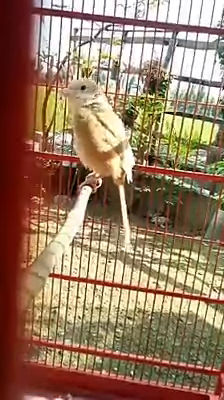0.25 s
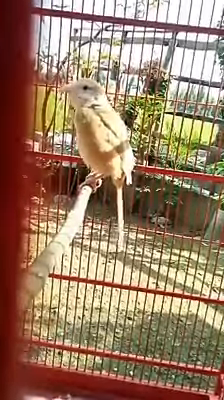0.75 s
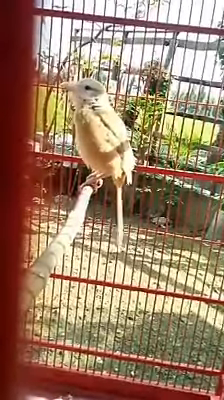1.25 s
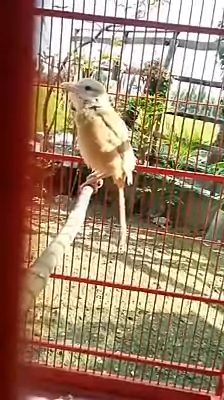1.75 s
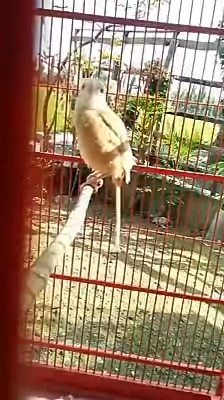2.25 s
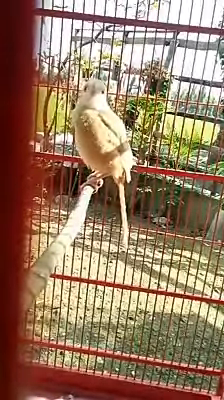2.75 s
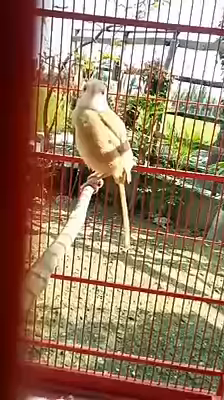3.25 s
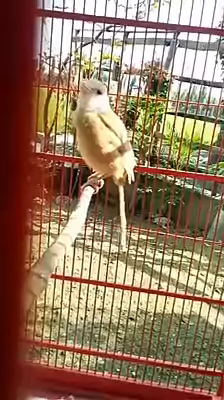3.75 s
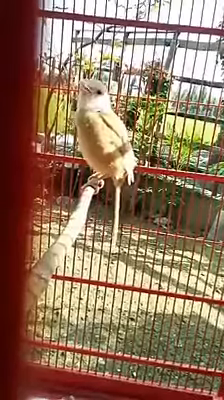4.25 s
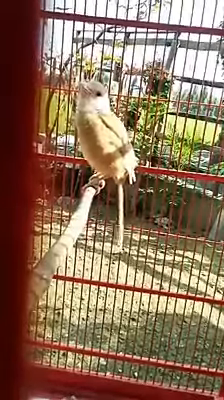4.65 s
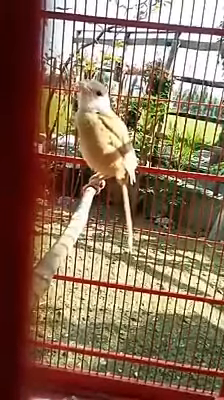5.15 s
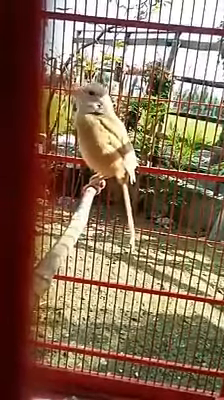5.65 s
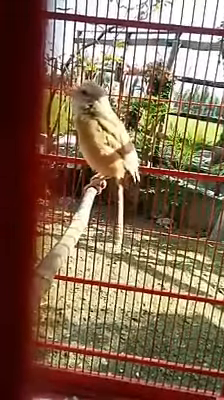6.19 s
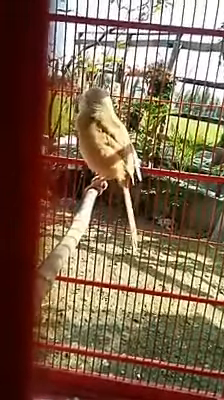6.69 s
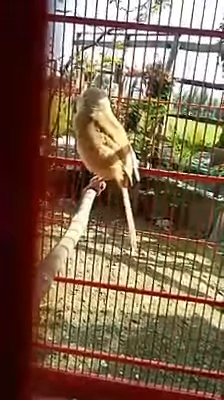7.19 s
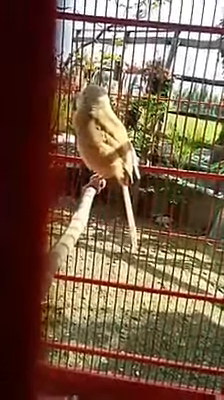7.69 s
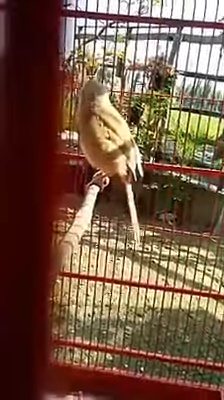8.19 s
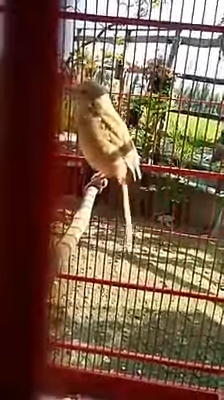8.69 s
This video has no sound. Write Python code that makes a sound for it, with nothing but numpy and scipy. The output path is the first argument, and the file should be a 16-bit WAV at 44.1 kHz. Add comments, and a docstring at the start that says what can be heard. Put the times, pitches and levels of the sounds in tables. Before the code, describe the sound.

Close to a phone outdoors, a caged bird calls in harsh nasal rasps and sharp squeaky chatter, separated by short pauses. The densest, loudest run comes around the middle, then single buzzy notes and chirps follow. Behind it are faint whistles of distant birds, a few soft hen clucks and a low, wavering traffic-like rumble that sinks in the gaps.

```python
"""Caged shrike in a yard

A caged shrike chatters harsh, nasal notes close to a phone: stacks of unsteady partials and turbulence
pass through throat bands, with sine glides, breath noise and a noisy treble. Sine whistles and ringing
clucks of far birds stand over noise shaped as a wavering low rumble and thin wash. The phone's noise
suppressor lets the yard through while calls fill the voice band, and turns it down between them."""
import sys
import numpy as np
from scipy import signal
from scipy.fft import rfft, irfft, next_fast_len
from scipy.io import wavfile
from scipy.ndimage import uniform_filter1d, minimum_filter1d

SR = 44100
rng = np.random.default_rng(int(sys.argv[2]) if len(sys.argv) > 2 else 0)


def dump_mix(stems):
    """Bounce the given channels to the path in sys.argv[1] as a 16-bit WAV at rate SR."""
    frames = np.atleast_2d(stems).T  # one column per channel
    limited = np.clip(frames, -1, 1)  # hard clip at full scale
    pcm = np.round(limited * 32767).astype(np.int16)
    wavfile.write(sys.argv[1], SR, pcm)


N = 393813


def gain_of(db):
    """Decibel law: amplitude ratio of a level."""
    return 10 ** (np.asarray(db) / 20)


def evened(x):
    """Power normalization: scale to rms 1."""
    return x / np.sqrt(np.mean(x ** 2) + 1e-20)


def add(mix, start_s, sound):
    """Linear superposition: add a sound in place, cut at the end of the mix."""
    part = mix[round(start_s * SR):][:len(sound)]
    part += sound[:len(part)]


def band(x, lo_hz, hi_hz, order=4):
    """Band-pass filtering with a maximally flat passband."""
    sos = signal.butter(order, [lo_hz, hi_hz], "band", fs=SR, output="sos")
    return signal.sosfilt(sos, x)


def coloured(points):
    """Spectral shaping: noise of rms 1 that follows the (freq_hz, level_db) points, silent outside them."""
    points_hz, points_db = np.transpose(points)
    size = next_fast_len(N)
    hz = np.fft.rfftfreq(size, 1 / SR)
    shape_db = np.interp(np.log(hz + 1), np.log(points_hz), points_db, -150, -150)
    spectrum = rfft(rng.standard_normal(size)) * gain_of(shape_db)
    return evened(irfft(spectrum, size)[:N])


def wander(count, ms):
    """Low-pass random fluctuation: twice-averaged noise of rms about 1 that changes within ms."""
    size = max(round(ms * SR / 1000), 1)
    once = uniform_filter1d(rng.standard_normal(count), size)
    return uniform_filter1d(once, size) * np.sqrt(1.5 * size)  # restores the rms lost by averaging


def yard():
    """Resonance shaping: far traffic hums in broad low resonances under a thin outdoor wash of noise."""
    # Level of the rumble ahead of the suppressor: time_s, level_db
    rumble_levels = [(0, -46), (.34, -42), (.69, -48), (1.37, -50.5), (2.06, -36), (2.4, -42.5),
                     (3.09, -44), (3.5, -34.5), (4.12, -41), (4.81, -47), (5.15, -39.5), (6.4, -49),
                     (6.87, -39.5), (7.21, -39.5), (7.8, -21), (8.24, -36), (8.6, -39.5), (9, -42.5)]
    # Low resonances: centre_hz, width_hz, relative_db
    resonances = [(62, 25, 0.5), (85, 16, 6), (157, 13, -20.5)]
    # Relative spectral density of the wash: freq_hz, level_db
    wash_spectrum = [(110, 1.5), (130, -6.5), (240, -22), (300, -30), (720, -28), (1900, -26),
                     (4900, -25.5), (5800, -31), (6800, -44.5), (8300, -50), (15000, -63)]
    wash_mean_db, wash_follows = -51.5, .4  # the wash follows the rumble's level by a share

    rumble_db = np.interp(np.arange(N) / SR, *np.transpose(rumble_levels))
    wash_db = wash_mean_db + wash_follows * (rumble_db - rumble_db.mean())
    hz = np.geomspace(15, 400, 80)
    power = sum(gain_of(db) ** 2 / (1 + (2 * (hz - centre_hz) / width_hz) ** 2) ** 3
                for centre_hz, width_hz, db in resonances)
    rumble = coloured(np.c_[hz, 10 * np.log10(power)])
    wash = coloured(wash_spectrum) * gain_of(0.54 * wander(N, 30))
    common = gain_of(rumble_db) * rumble + gain_of(wash_db) * wash
    # a weak delayed copy of opposite sign at the two microphone ports
    return common + .03 * np.roll(common, SR // 20) * [[1], [-1]]


def far_whistles():
    """Frequency modulation: gliding sines flutter in pitch and level, with weak harmonics."""
    # Far whistles: start_s, length_s, from_hz, to_hz, from_db, to_db
    whistles = [(.69, 0.062, 2600, 2480, -77, -65), (1.011, 0.078, 1950, 2040, -66, -64.5),
                (1.239, .14, 2370, 2160, -78.5, -64), (2.598, 0.092, 2650, 2057, -68, -65),
                (2.804, 0.078, 2150, 2500, -74, -56), (4.861, 0.091, 1768, 1840, -45.5, -42),
                (5.58, 0.089, 1950, 1925, -71.5, -60), (5.785, 0.15, 2320, 2150, -73.5, -66.5),
                (6.647, .28, 1862, 1815, -54.5, -55), (6.742, .13, 2840, 2505, -59.5, -73.5),
                (6.944, .14, 1780, 1765, -45, -61), (7.097, 0.042, 1770, 1770, -69, -69),
                (8.467, 0.08, 3350, 3250, -79, -66)]
    overtones_below_hz = 2100  # whistles that start lower carry stronger overtones

    out = np.zeros(N)
    for start_s, length_s, from_hz, to_hz, from_db, to_db in whistles:
        hz, db = np.linspace((from_hz, from_db), (to_hz, to_db), round(length_s * SR)).T
        n = len(hz)
        overtone_db = -16 if from_hz < overtones_below_hz else -34
        phase = 2 * np.pi * np.cumsum(hz * (1 + 0.0031 * wander(n, 11.0))) / SR
        flutter = gain_of(db + 4.9 * wander(n, 6.6)) * signal.windows.tukey(n, .3)
        overtones = np.sin(2 * phase) + 0.72 * np.sin(3 * phase)
        tone = np.sin(phase) + gain_of(overtone_db) * overtones
        add(out, start_s, np.sqrt(2) * flutter * tone)  # sqrt 2: a sine of rms 1
    return out


def far_clucks():
    """Modal decay: a far hen's clucks are damped sines roughened by fast random modulation."""
    # Clucks: start_s, level_db
    clucks = [(3.0041, -41.5), (3.4047, -39), (6.6476, -56), (7.1791, -51.5), (7.585, -39.5),
              (7.984, -45.5)]
    # Modes of one cluck: freq_hz, relative_db, t60_s
    modes = [(1136, 6, 0.17), (1107, 16, 0.032), (750, -5, 0.085), (546, -9, 0.11), (5050, -17, 0.25)]

    out = np.zeros(N)
    t = np.arange(SR // 5) / SR
    onset = 1 - np.exp(-(t / .009) ** 2)
    for start_s, level_db in clucks:
        rings = sum(gain_of(db - 60 * t / t60_s) * np.sin(2 * np.pi * hz * t) for hz, db, t60_s in modes)
        rasp = 1 + 0.8 * wander(len(t), 1.93)
        add(out, start_s, gain_of(level_db) * onset * rings * rasp)
    return out


def suppressed(noise, calls):
    """Downward expansion: the phone turns the yard down while no call fills the voice band."""
    depth_db, middle_db, softness_db = 18, -46.5, 7.3
    power = uniform_filter1d(band(calls.mean(0), 900, 6300, order=2) ** 2, 900)
    power_db = 10 * np.log10(abs(power) + 1e-12)
    shut = 1 / (1 + np.exp((power_db - middle_db) / softness_db))
    held = minimum_filter1d(shut, 900, origin=400)  # opens at once, shuts a little late
    return noise * gain_of(-depth_db * uniform_filter1d(held, 500))


def effort_db(attack_s, hold_s, release_s, first_db, last_db):
    """Amplitude envelope: attack, a sloping and bulging hold, release, as levels in dB."""
    rise_db, fall_db = 42, 39
    rise_bend, fall_bend = 1.7, 1.3  # exponents: the level eases into and out of the hold
    swell_db_per_s = 22  # a longer hold bulges more in its middle
    up, on, down = (np.linspace(0, 1, max(round(s * SR), 2)) for s in (attack_s, hold_s, release_s))
    held = first_db + (last_db - first_db) * on + swell_db_per_s * hold_s * np.sin(np.pi * on)
    attack = first_db - rise_db * (1 - up) ** rise_bend
    release = last_db - fall_db * down ** fall_bend
    return np.r_[attack, held, release]


def pulse_stack(n, top_hz, rough, alternate):
    """Period doubling: alternating pulses add partials at half multiples; roughness frays them all."""
    place = np.linspace(-1, 1, n)
    arch = 1 - 0.06 * (place - .1) ** 2  # membranes are tightest in mid note
    warble = .002 * wander(n, 25) + .065 * rough ** 2 * wander(n, 9)
    turns = np.cumsum(top_hz * arch * (1 + warble)) / SR
    ragged = .7 + 1.2 * place ** 2  # start and end are rougher than the middle
    limit_hz = 12600
    stack = np.zeros(n)
    for k in range(2, int(limit_hz / top_hz) + 1):
        # partial k lies at k/2 times the pulse rate; high ones swell and slip most
        height = k * top_hz / limit_hz
        swell = np.clip(wander(n, 32 - 24 * rough), -3, 1.5)
        swell_db = (2.6 + 3.5 * rough + 3.5 * height) * swell
        weight = (1, alternate, .6, alternate)[k % 4]  # even multiples of the pulse rate lead
        start_phase = 2 * np.pi * rng.random()
        slip = (.6 * rough + 1.6 * height ** 3) * ragged * wander(n, 3)
        stack += weight * gain_of(swell_db) * np.cos(np.pi * k * turns + start_phase + slip)
    turbulence = (.12 + 1.9 * rough ** 2) * ragged * rng.standard_normal(n)
    return evened(stack) + turbulence


def throat_filter(source, low_db, high_db):
    """Source-filter principle: formant bands of throat and beak set the colour of the source."""
    # Bands that throat and beak pass: from_hz, to_hz
    formants = [(1010, 1640), (1820, 2790), (2900, 4410), (4760, 6000)]
    band_levels_db = (low_db - 19, low_db, 0, high_db)
    out = sum(gain_of(db) * evened(band(source, lo_hz, hi_hz, order=7))
              for (lo_hz, hi_hz), db in zip(formants, band_levels_db))
    short_power = uniform_filter1d(out ** 2, 600)
    return out / (short_power + .01) ** .4  # the air stream sets the total power


def note(attack_s, hold_s, release_s, first_db, last_db, top_hz, rough, alternate, low_db, high_db):
    """Source-filter synthesis of one note; returns its sound, effort and extreme-treble envelope."""
    flutter_db, flutter_ms = 2, 7  # the effort is never steady
    # the extreme treble is fainter in notes whose low band lies under the knee
    treble_slope, treble_knee_db = 1.1, -7
    effort = gain_of(effort_db(attack_s, hold_s, release_s, first_db, last_db))
    n = len(effort)
    rough, alternate = np.clip([rough, alternate], 0, 1)
    source = pulse_stack(n, top_hz, rough, alternate)
    voiced = throat_filter(source, low_db, high_db)
    flutter = gain_of(flutter_db * np.minimum(wander(n, flutter_ms), 1))
    treble = effort * gain_of(treble_slope * min(low_db - treble_knee_db, 0))
    return effort * flutter * voiced, effort, treble


def slides():
    """Frequency modulation: quick whistled glides inside the notes, with a jittering pitch."""
    # Glides: start_s, length_s, from_hz, to_hz, level_db
    glides = [(0.386, 0.064, 2980, 3020, -31.5), (0.64, 0.028, 3100, 2970, -29),
              (1.818, 0.028, 4190, 3840, -14.5), (3.93, 0.044, 3310, 3870, -18.5),
              (3.969, 0.028, 2174, 2855, -20.5), (4.333, 0.037, 4350, 2730, -17.5),
              (4.37, .015, 2825, 4340, -22), (4.383, 0.011, 4150, 3050, -19),
              (4.393, 0.031, 3120, 4300, -22.5), (4.501, 0.038, 5520, 3500, -13.5),
              (4.623, 0.011, 4060, 3750, -12.5), (4.641, 0.015, 3950, 3340, -12.5),
              (4.676, 0.029, 2200, 2380, -31), (4.71, 0.029, 2790, 2175, -29),
              (4.792, 0.042, 3500, 2550, -19), (8.357, 0.013, 2470, 2570, -21)]
    out = np.zeros(N)
    for start_s, length_s, from_hz, to_hz, level_db in glides:
        n = round(length_s * SR)
        hz = np.linspace(from_hz, to_hz, n) * (1 + 0.023 * wander(n, 2.2))
        tone = np.sqrt(2) * np.sin(2 * np.pi * np.cumsum(hz) / SR)
        add(out, start_s, gain_of(level_db) * signal.windows.tukey(n, .6) * tone)
    return out


def breath_noise(breath):
    """Turbulent flow: noise with a broad spectrum follows the breath, alike at both ports."""
    # Relative spectral density of the breath: freq_hz, level_db
    breath_spectrum = [(150, -37), (700, -41.5), (1100, -37), (1600, -33.5), (6200, -26), (8300, -33.5)]
    return gain_of(-23) * breath * coloured(breath_spectrum)


def noisy_treble(breath, treble):
    """Amplitude-modulated noise: uneven high bands follow the notes, independent at the two ports."""
    # Relative spectral density of the high noise, with narrow dips: freq_hz, level_db
    high_spectrum = [(4970, -24.5), (8450, -1.5), (8660, -16.5), (10400, 0), (12200, -8.5), (15900, -36.5),
                     (22000, -120)]
    high_db, extreme_db = -33, -39
    high = np.array([coloured(high_spectrum), coloured(high_spectrum)])
    extreme = np.array([evened(band(v, 13000, 15500)) for v in rng.standard_normal((2, N))])
    return gain_of(high_db) * breath * high + gain_of(extreme_db) * treble * extreme


def shrike():
    """Superposition of voiced notes, amplitude-modulated rasp, glides, breath and treble noise."""
    # Notes: start_s, attack_s, hold_s, release_s, first_db and last_db (effort at the ends of the hold,
    # before its swell), top_hz (pulse rate ahead of arch and warble), roughness and alternation (clipped
    # to 0-1), low_db, high_db (throat bands against the main band)
    notes = [ (0.017, 0.049, 0.17, 0.044, -25, -30.5, 555.7, .37, 0.64, -15.5, -8.5),
             (0.26, 0.015, 0.0051, 0.035, -16.5, -29, 1244, 0.61, 0, -7.5, -5.5),
             (0.38, 0.017, 0.044, 0.03, -21.5, -21, 1220, 0.76, 0.52, -21, -1.5),
             (0.635, 0.0088, 0.0079, 0.026, -26.5, -27.5, 1376, 0.68, 0.65, -13.5, 3),
             (0.755, 0.029, 0.2, 0.069, -25, -29.5, 587, 0.46, 0.88, -14.5, -7.5),
             (1.519, 0.022, 0.043, 0.024, -54, -47.5, 1258, 0.76, 0.45, 2, -17.5),
             (1.584, .022, 0.064, 0.02, -39, -43, 1252, 0.88, 0.54, 6.5, -8),
             (1.761, 0.072, 0.05, 0.024, -18, -19, 1255, 0.74, 0.5, -12, -1.5),
             (1.924, 0.048, .11, 0.01, -26.5, -26.5, 537, 0.27, 0.4, -20, -5.5),
             (2.076, 0.022, 0.068, 0.039, -11.5, -33, 1308, 0.84, 0, -12.5, 12),
             (2.168, 0.034, 0.12, 0.052, -24.5, -35.5, 638, 0.69, 0.7, -11.5, -7.5),
             (2.337, 0.019, 0.1, 0.037, -44, -52, 599, 0.88, 0.6, -2.5, 7),
             (2.449, 0.026, 0.1, 0.03, -44, -35.5, 597, 0.86, 0.5, -2, 8),
             (2.846, 0.06, 0.13, 0.065, -29.5, -26, 532, 0.41, 0.5, -18.5, -8),
             (3.746, 0.02, 0.026, 0.031, -38, -36.5, 1268, 0.8, 0.4, -9.5, -10),
             (3.886, 0.029, 0.075, 0.038, -18, -21, 1327, 0.93, 0.18, -6, -10),
             (4.063, 0.065, 0.15, 0.031, -22, -27.5, 606, 0.49, 0.77, -16, -1.5),
             (4.264, 0.025, .004, 0.038, -20.5, -18.5, 608, 0.56, .8, -20, -3.5),
             (4.301, 0.025, 0.1, 0.027, -25, -25.5, 1097, 0.98, 0.76, -12, -8),
             (4.421, 0.02, 0.075, 0.013, -17.5, -30.5, 1105, 0.96, 1, -15.5, -0.5),
             (4.495, 0.025, .18, 0.014, -17, -16, 1158, 0.74, .5, -21, 3.5),
             (4.691, 0.02, 0.091, 0.013, -12, -30, 1193, 0.82, 0.6, -25, 13),
             (4.758, 0.015, 0.021, .014, -14, -13.5, 1206, .8, 0.9, -43, 13.5),
             (4.782, .018, 0.046, 0.027, -13, -16, 1254, 1, 0, -26, -13.5),
             (4.848, 0.013, 0.11, 0.027, -21.5, -31.5, 1295, 1.06, 0, -10.5, -18.5),
             (5.244, 0.042, .012, .04, -47, -44.5, 1075, 0.86, 0.16, 7, 31),
             (5.345, 0.043, .15, 0.07, -33, -26, 509, 0.36, .53, -16, -7),
             (6.104, 0.026, .012, 0.074, -52, -51, 1190, .94, 0, -4, 17.5),
             (6.243, 0.013, .045, .012, -59, -50.5, 611.7, .6, .63, -7.5, 9),
             (6.294, 0.03, 0.29, 0.032, -25, -22, 610, 0.61, 0.8, -7, -15),
             (7.181, 0.04, .14, 0.058, -31.5, -22.5, 556, 0.31, 0.58, -20.5, -7),
             (7.387, .02, 0.051, .03, -54, -62, 548, 0.87, .8, -15, -2),
             (7.46, 0.048, 0.017, .06, -57.5, -58.5, 1180, .92, 1, -11, 31.5),
             (8.113, 0.056, 0.13, 0.072, -27.5, -28, 532, 0.31, 0.38, -16, -5.5),
             (8.335, 0.045, .025, 0.028, -20.5, -25.5, 1211, 0.87, 0.8, -9, -15.5),
             (8.404, .02, 0.042, 0.04, -62, -67.5, 1220, 0.93, 0.6, -3, -8),
             (8.539, 0.02, 0.011, .025, -39, -37.5, 1345, .9, 0.95, -12.5, -2.5),
             (8.654, 0.039, 0.024, 0.027, -19.5, -18.5, 1285, 0.83, 0, -11, -12),
             (8.731, 0.014, 0.042, .03, -50, -64, 1270, 0.95, 0.3, -7, -3),
             (8.815, .02, 0.049, 0.015, -58.5, -51, 1210, 0.95, 1, -6.5, 8),
             (8.872, 0.05, 0.023, 0.035, -20.5, -22, 1195, 0.69, 1, -20, -9.5), ]
    # Throb of the long rasp: from_s, to_s, rate_hz, depth_db (either way)
    from_s, to_s, rate_hz, depth_db = (6.33, 6.6, 80, 3)

    voice, effort, treble = np.zeros((3, N))
    for start_s, *settings in notes:
        sound, note_effort, note_treble = note(*settings)
        add(voice, start_s, sound)
        add(effort, start_s, note_effort)
        add(treble, start_s, note_treble)
    t = np.arange(N) / SR
    rasping = (t > from_s) * (t < to_s)
    voice *= gain_of(depth_db * np.sin(2 * np.pi * rate_hz * t) * rasping)
    breath = effort ** 0.97  # its level in dB changes a little less than the effort's
    return voice + slides() + breath_noise(breath) + noisy_treble(breath, treble)


def reverberation(bird):
    """Diffuse reflection: cage and yard walls return a noise tail that decays exponentially."""
    t60_s, level_db = 0.15, -43.5
    t = np.arange(SR // 10) / SR
    tail = rng.standard_normal((2, len(t))) * gain_of(-60 * t / t60_s)
    ports = tail[:1] + .8 * tail[1:] * [[1], [-1]]  # shared part plus or minus a difference
    wet = signal.fftconvolve(bird, ports, axes=1)[:, :N] / np.linalg.norm(tail[0])
    return gain_of(level_db) * wet


def scene():
    """Superposition of the calls and the yard, whose level the calls control."""
    bird = shrike()
    calls = bird + reverberation(bird) + far_whistles() + far_clucks()
    return calls + suppressed(yard(), calls)


def record(dry):
    """Amplitude and band limits: clipping at full scale, then a linear-phase low-pass."""
    edge_hz = 15590
    lowpass = signal.firwin(511, edge_hz, window=("kaiser", 9), fs=SR)
    return signal.oaconvolve(np.clip(dry, -1, 1), lowpass[None], "same")


dry = scene()
out = record(dry)
dump_mix(out)
```